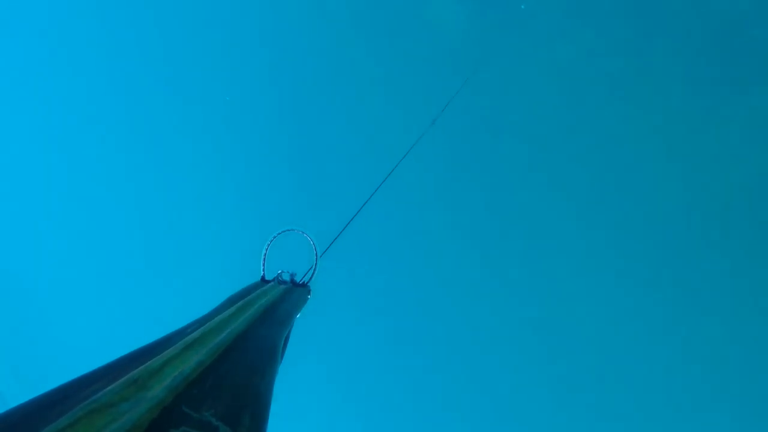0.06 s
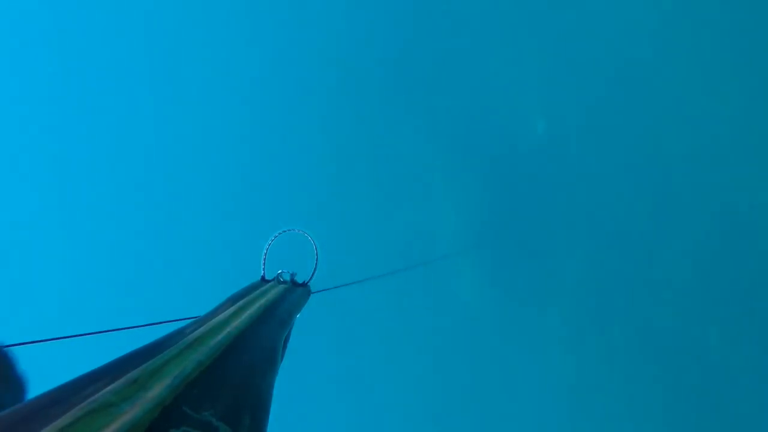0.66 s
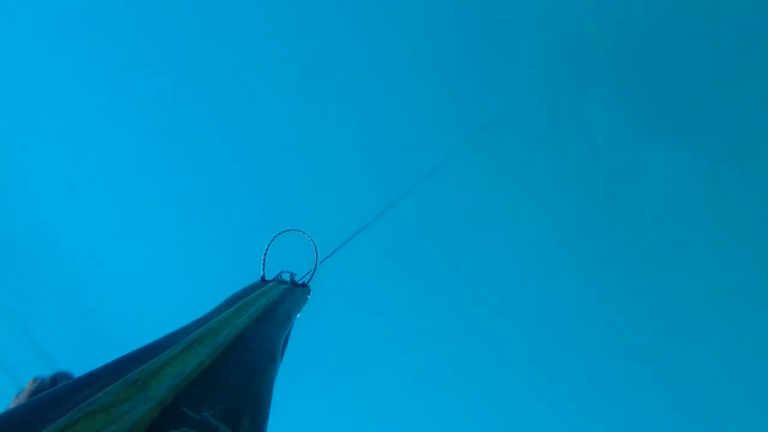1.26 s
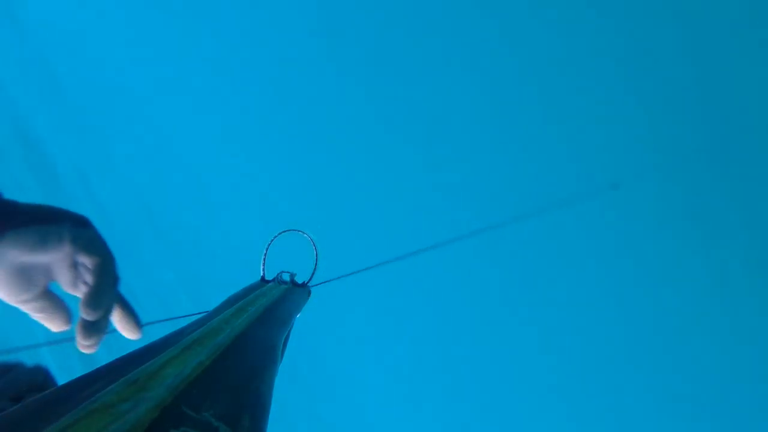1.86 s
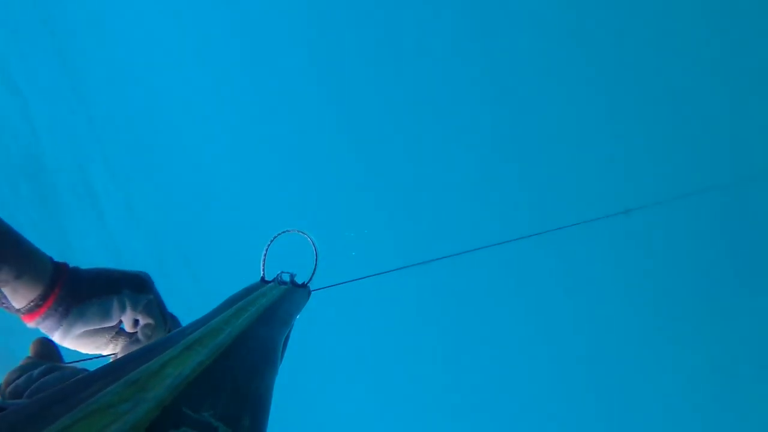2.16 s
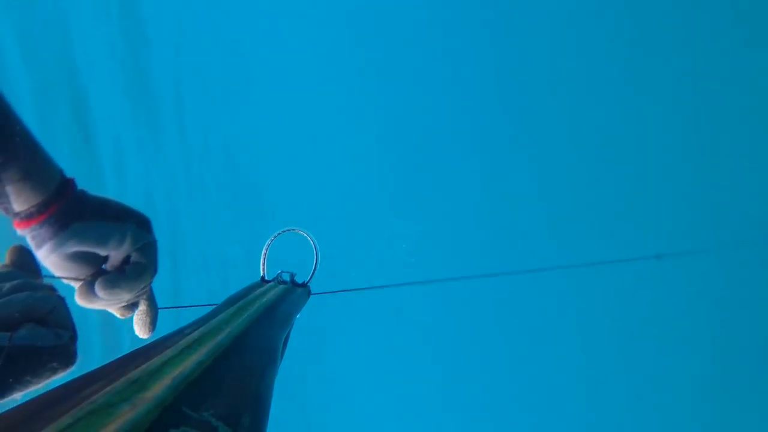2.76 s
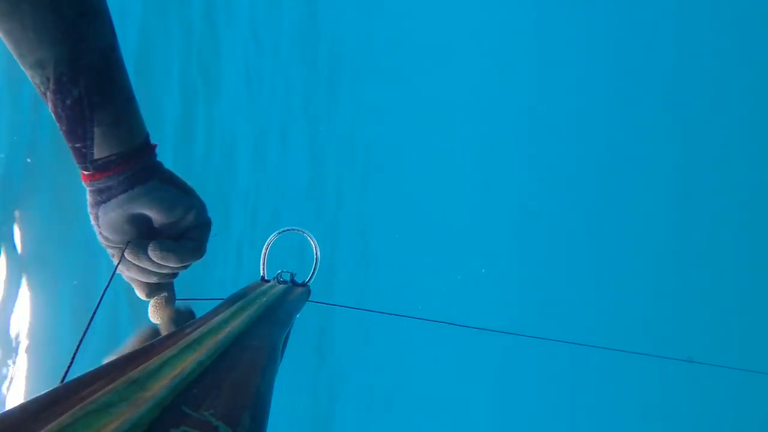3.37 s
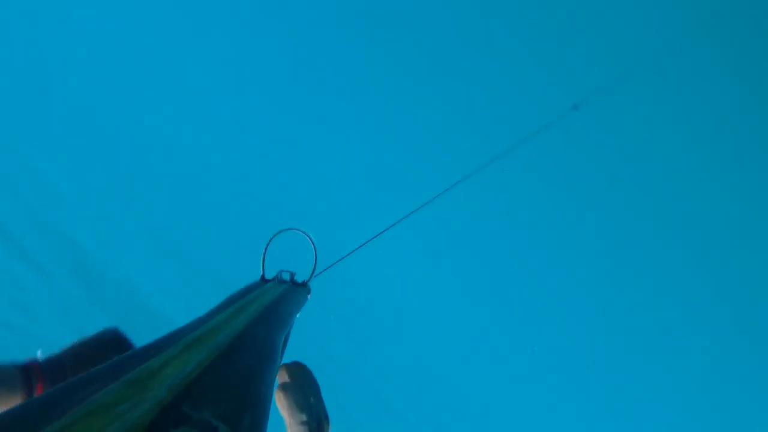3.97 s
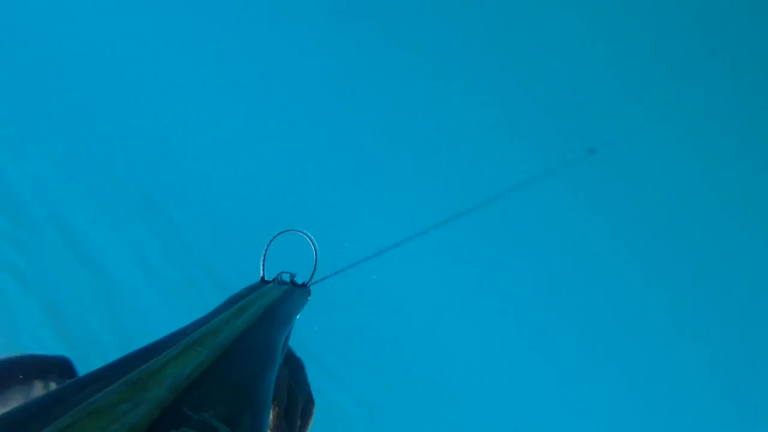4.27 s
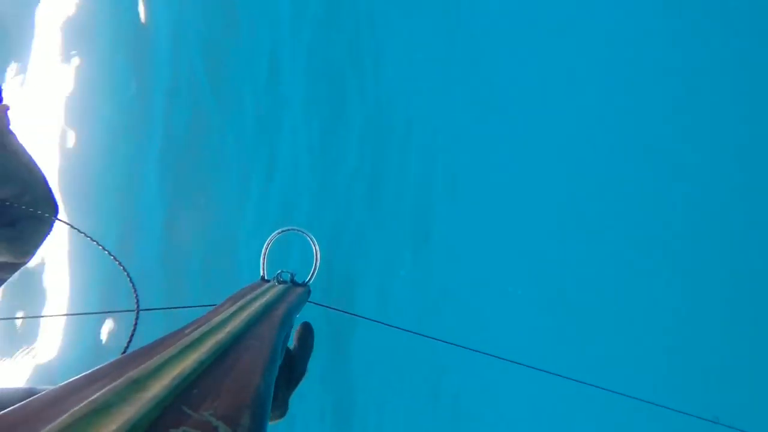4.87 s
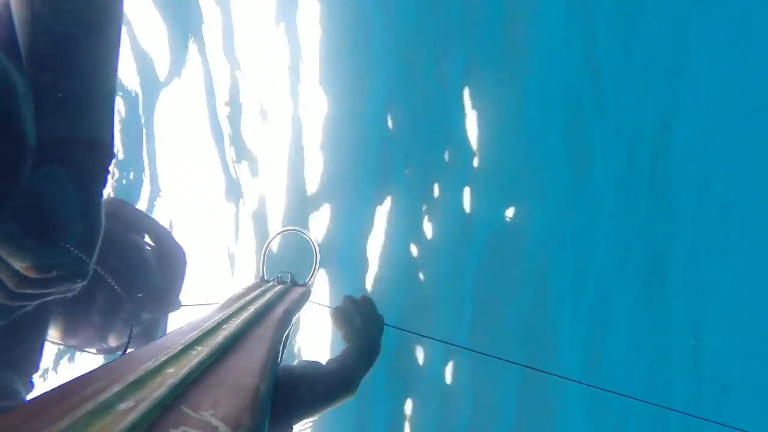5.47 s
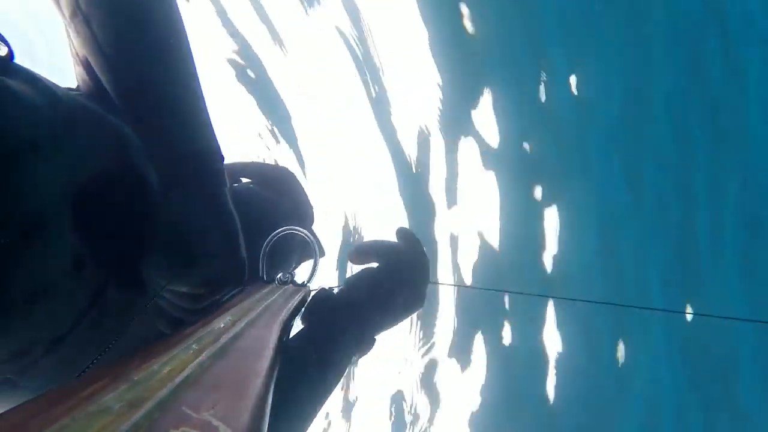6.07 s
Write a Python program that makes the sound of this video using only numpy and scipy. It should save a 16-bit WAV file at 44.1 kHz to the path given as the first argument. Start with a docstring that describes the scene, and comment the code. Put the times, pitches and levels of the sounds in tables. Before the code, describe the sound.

A wooden hull rumbles and knocks, heard underwater, while water gurgles, a hauled line rubs and tiny snaps cut through soft hiss.

```python
"""Under a small wooden boat, heard from inside a waterproof housing; a swimmer hauls a line alongside.
The sea hisses and tiny collapsing bubbles snap. Shoves set the hull rumbling in its low modes.
Water rubs and gurgles along the planks and trapped air gulps. The taut line whistles faintly
and zips over the keel by stick-slip. Knocks ring the hull, singly and in one hard burst."""
import sys
import numpy as np
from scipy import signal
from scipy.fft import rfft, irfft
from scipy.io import wavfile
from scipy.ndimage import uniform_filter1d

SR = 44100
rng = np.random.default_rng(int(sys.argv[2]) if len(sys.argv) > 2 else 0)


def store_wav(level_fs):
    """Save 16-bit WAV to argv[1]."""
    pcm = np.round(np.clip(np.atleast_2d(level_fs), -1, 1) * 32767)
    wavfile.write(sys.argv[1], SR, pcm.T.astype(np.int16))


N = 274724
TIME = np.arange(N) / SR

# spectra: f/Hz, relative density/dB
SEA_SPECTRUM = [(140, 9), (220, 0.5), (820, 4.5), (1000, -5.5), (1750, -4), (2200, -10), (3200, -7),
                (3750, -14), (5050, -12.5), (5350, -17.5), (6100, -14.5), (8200, -22), (9800, -19.5),
                (10120, -14), (10500, -23), (13000, -29)]
SNAP_SPECTRUM = [(800, -19), (3200, 6.5), (4900, -3), (6300, -0.5), (7600, -2.5), (15000, -18)]
WASH_SPECTRUM = [(200, -11), (480, -11), (720, -3.5), (900, -5.5), (1250, 3), (1420, -16.5), (1600, -5),
                 (1780, -11.5), (2000, -13), (2500, -29), (3600, -63.5)]
HOUSING_SPECTRUM = [(1900, -19.5), (2600, -4), (2740, 7), (2890, -9), (3350, -3.5), (3800, -33),
                    (4100, -13), (4500, -23), (4950, -16), (5400, -29), (7200, -24.5), (15000, -54)]
CRACK_SPECTRUM = [(300, -9), (900, 19.5), (2300, 8), (2750, 17), (3400, 5.5), (3900, -3.5), (4900, -3),
                  (15000, -45.5)]  # housing under a blow

# near snaps, likely shrimp: t/s, peak/dB, ring re tick/dB
SNAPS = [(0.2303, -23.5, -11), (0.9678, -30, -18), (1.1768, -19, -21), (1.652, -20, -5), (1.766, -29.5, 1),
         (1.949, -21.5, -17), (1.9726, -17, -12), (2.389, -10.5, -5.5), (2.7967, -33, -15),
         (3.058, -30, -14), (3.1905, -33, -12), (3.2018, -29, 0), (3.9703, -24, -7), (4.083, -21, -22),
         (4.109, -29, -15), (4.3612, -18.5, -21), (4.4374, -15, -22), (4.4985, -12.5, 4),
         (4.724, -28.5, -10), (4.9574, -25.5, -14), (5.295, -32, -6), (5.92, -23.5, -17), (5.981, -27, -3)]
# line whistle envelope: t/s, level/dB
WHISTLE_ENVELOPE = [(2.07, -68), (2.17, -50), (2.34, -76)]
# line whistle partials: f/Hz, gain/dB
WHISTLE_PARTIALS = [(10400, -4), (12540, -16), (14620, -16)]

# swimmer's shoves on the hull: start/s, end/s, level/dB
SHOVES = [(0.097, 0.268, -20), (0.287, 0.386, -11), (0.504, 0.71, -14), (0.961, 1.133, -17.5),
          (1.689, 1.82, -18), (1.82, 1.906, -12.5), (1.967, 2.12, -16.5), (3.901, 4.105, -11),
          (5.318, 5.4, -29), (6.158, 6.238, -22.5)]
# hull lurches: t/s, f/Hz, level/dB
LURCHES = [(-.04, 29.21, -13.5), (3.937, 23.92, -6.5)]
HEAVE_HZ, BEND_HZ = (24, 29), (59, 87)
SHOVE_ATTACK_S, BEND_FALL_DB_PER_S, HEAVE_FALL_DB_PER_S = 0.054, 81, 20

# air pockets under the hull: centre/s, f/Hz, level/dB, length/s
GULPS = [(0.21, 800, -35.5, 0.05), (0.259, 680, -31.5, 0.067), (0.48, 390, -21.5, 0.057),
         (0.857, 780, -36, 0.038), (1.603, 780, -31.5, 0.027), (2.035, 358.3, -21, 0.086),
         (3.635, 163, -23.5, 0.17), (3.745, 136.5, -22.5, 0.3), (4.179, 790, -28.5, 0.03),
         (4.266, 373, -23, 0.1), (4.436, 720, -31.5, 0.15), (4.804, 152, -31, 0.14),
         (5.545, 146, -29.5, 0.19), (5.662, 160, -33, 0.18), (5.798, 364, -25, 0.19),
         (5.911, 356.5, -22.5, 0.16), (6.06, 158.5, -31.5, 0.19)]
# flow-driven hull resonances: f/Hz, width/Hz, relative level/dB
SLOSH_MODES = [(137, 6.4, 2.5), (163, 5.6, -1.5)]
PLANK_MODES = [(302, 83, -3), (362.5, 24, 8), (418.4, 6.8, 4)]
# water surges: crest/s, rise/s, fall/s, wash/dB, gurgle/dB, planks/dB, housing/dB
SURGES = [(.2, 0.33, 0.28, -39, -38, -35, -46), (1.85, 0.91, 0.64, -41.5, -47.5, -40, -57),
          (4.31, 0.21, 0.27, -35, -33.5, -31.5, -38), (5.87, 0.32, 0.29, -34, -46, -40, -46.5)]
# line rubs on the hull: start/s, end/s, wash/dB, housing/dB
RUBS = [(0.407, 0.542, -31.5, -33), (0.546, 0.686, -36, -36.5), (0.727, 0.78, -37.5, -45),
        (0.896, 0.964, -37, -48.5), (1.014, 1.28, -35, -44.5), (1.195, 1.24, -28.5, -47),
        (1.485, 1.58, -42.5, -44.5), (2.008, 2.088, -29.5, -37.5), (2.097, 2.355, -43, -45),
        (2.475, 2.582, -50, -47.5), (2.637, 2.696, -43.5, -44), (2.901, 3.018, -42, -50),
        (3.044, 3.138, -40, -52), (3.193, 3.258, -40.5, -55), (3.588, 3.66, -33.5, -42),
        (3.695, 3.765, -30.5, -43), (4.606, 4.865, -39.5, -53)]

# line over the keel, one curve per pull: t/s, f/Hz, level/dB
PULLS = [
    [(.313, 2907, -13.5), (.327, 3533, -13), (.335, 3055, -14), (.344, 1800, -20), (.351, 665, -22.5),
     (.362, 328, -23), (.385, 330, -37)],
    [(.535, 1500, -29), (.552, 1485, -23), (.6, 1497, -34.5), (.655, 1350, -21), (.715, 1035, -35.5)],
    [(1.025, 1666, -34), (1.075, 2440, -41.5)],
    [(1.199, 749, -28), (1.215, 702, -17.5), (1.245, 696, -33)],
]
# noise share of the squeak's fundamental, per pull: power fraction/1
PULL_CHURN = [0.44, 0.83, 0.92, 0.076]
# blows on the hull: t/s, level/dB, low-pass corner/Hz, crack/dB, clunk/dB
KNOCKS = [(0.319, -3.5, 302, -44, -21), (1.365, -16.5, 1500, -22.5, -35), (1.853, -15, 1200, -26.5, -30),
          (2.036, -10, 1190, -19, -33), (3.324, -28, 1500, -30.5, -28.5), (3.793, -13.5, 600, -54, -24.5),
          (3.864, -13, 895, -25.5, -34), (3.886, -0.5, 1000, -25, -32), (3.909, 1.5, 1200, -16.5, -3.5),
          (3.946, -0.5, 1200, -16.5, -3), (3.981, 3.5, 650, -16, -12.5)]
# struck hull modes: f/Hz, gain/dB, t60/s
HULL_MODES = [(86, -10.5, 0.19), (125, -16.5, 0.17), (153.87, -21, 1), (232, -13.5, 0.09),
              (267.7, -17.5, 0.18), (366, -11, 0.11), (417.5, -16, 0.16), (491, -11.5, 0.048),
              (839, -18, 0.12), (1045, -12, 0.033)]


def from_db(db):
    return np.exp(np.log(10) / 20 * np.asarray(db))


def unit_rms(x):
    return x / np.sqrt(np.mean(x ** 2) + 1e-20)


def level_out(x, span_s):
    """Running rms held at 1."""
    power = uniform_filter1d(x * x, max(int(span_s * SR), 2))
    return x / np.sqrt(np.abs(power) + 1e-12)


def curves(rows):
    """Breakpoint columns interpolated per sample."""
    times_s, *columns = np.transpose(rows)
    return [np.interp(TIME, times_s, column) for column in columns]


def gate(rows):
    """1 between the first and last breakpoint."""
    return 1.0 * ((TIME > rows[0][0]) & (TIME < rows[-1][0]))


def drift(rate_hz):
    """Low-passed noise, rms 1."""
    hop = 40
    pole = np.exp(-2 * np.pi * rate_hz * hop / SR)
    slow = signal.lfilter([1], [1, -2 * pole, pole * pole], rng.standard_normal(N // hop + 2002))[2000:]
    return np.interp(np.arange(N) / hop, np.arange(len(slow)), unit_rms(slow))


def colour(x, spectrum, size=2048):
    """Minimum-phase filter of unit energy."""
    hz, db = np.transpose(spectrum)
    grid_hz = np.maximum(np.fft.rfftfreq(size, 1 / SR), 1)
    gain = from_db(np.interp(np.log(grid_hz), np.log(hz), db))
    cepstrum = irfft(np.log(gain))
    cepstrum[size // 2:] = 0
    response = irfft(np.exp(rfft(2 * cepstrum)))
    return signal.fftconvolve(x, response / np.linalg.norm(response))[:len(x)]


def noise_band(hz, width_hz):
    """White noise through two equal resonators."""
    b, a = signal.iirpeak(hz, hz / (1.5 * width_hz), fs=SR)
    return signal.lfilter(b, a, signal.lfilter(b, a, rng.standard_normal(N)))


def ring(force, hz, t60_s):
    """Damped mode; a unit impulse starts a unit sine."""
    r, w = from_db(-60 / (t60_s * SR)), 2 * np.pi * hz / SR
    return signal.lfilter([0, np.sin(w)], [1, -2 * r * np.cos(w), r * r], force + 1e-18)


def wavering(hz, wander_hz, rate_hz, flicker_db):
    """Tone of rms about 1; pitch and level wander."""
    phase = 2 * np.pi * (np.cumsum(hz + wander_hz * drift(rate_hz)) / SR + rng.random())
    return np.sqrt(2) * np.sin(phase) * from_db(flicker_db * drift(rate_hz))


def sea(hiss_db=-43, snaps_per_s=60, snap_db=-43, ring_db=-15, t60_cycles=20):
    """Steady hiss with far snaps, mostly faint, at random pitches."""
    nearness_db = np.minimum(6 * rng.exponential(1, N), 18)
    clicks = (rng.random(N) < snaps_per_s / SR) * from_db(snap_db + nearness_db)
    pitches_hz = np.geomspace(4000, 13000, 12)
    choice = rng.integers(0, len(pitches_hz), N)
    rings = sum(ring(clicks * (choice == k), hz, t60_cycles / hz) for k, hz in enumerate(pitches_hz))
    hiss = from_db(hiss_db) * colour(rng.standard_normal(N), SEA_SPECTRUM)
    return hiss + colour(clicks + from_db(ring_db) * rings, SNAP_SPECTRUM)


def snaps(collapse_s=0.0007, echo_s=0.019, echo_db=-26, ring_rise_s=0.00035, ring_hz=6200):
    """Bubble collapse: hard tick, brief housing ring, faint scatter from hull and surface."""
    out, t = np.zeros(N), TIME[:SR // 25]
    envelope = np.exp(-t / collapse_s) + from_db(echo_db) * np.exp(-t / echo_s)
    housing = t / ring_rise_s * np.exp(1 - t / ring_rise_s) * np.sin(2 * np.pi * ring_hz * t)
    for start_s, peak_db, ring_db in SNAPS:
        at = int(start_s * SR)
        tick = colour(rng.standard_normal(len(t)) * envelope, SNAP_SPECTRUM)
        snap = tick / np.abs(tick).max() + from_db(ring_db) * housing
        out[at:at + len(t)] += from_db(peak_db) * snap / np.abs(snap).max()
    return out


def line_whistle():
    """Thin high whistle of the taut line running through the hand."""
    partials = sum(from_db(db) * wavering(hz, wander_hz=50, rate_hz=110, flicker_db=6.5)
                   for hz, db in WHISTLE_PARTIALS)
    return from_db(curves(WHISTLE_ENVELOPE)[0]) * partials * gate(WHISTLE_ENVELOPE)


def push(start_s, end_s, fall_db_per_s):
    """Envelope of one push: ramp, hold, decay."""
    attack = np.clip((TIME - start_s) / SHOVE_ATTACK_S, 0, 1)
    return attack * from_db(-fall_db_per_s * np.maximum(TIME - end_s, 0))


def shove_envelope(fall_db_per_s):
    """Swing of a hull mode; the strongest shove rules."""
    pushes = [from_db(db) * push(start_s, end_s, fall_db_per_s) for start_s, end_s, db in SHOVES]
    return np.max(pushes, axis=0)


def hull_rumble(bend, heave_rest_db=-29.5, heave_share_db=-11.5, bend_rest_db=-36, upper_db=-8):
    """The hull heaves in two beating modes, swings on after a lurch and booms in two bending modes."""
    shoved = from_db(heave_share_db) * shove_envelope(HEAVE_FALL_DB_PER_S)
    beating = sum(wavering(hz, wander_hz=0.73, rate_hz=6.1, flicker_db=-1.0) for hz in HEAVE_HZ)
    heave = np.hypot(from_db(heave_rest_db), shoved) * beating
    for start_s, hz, db in LURCHES:
        swing = from_db(db) * push(start_s, start_s + SHOVE_ATTACK_S, HEAVE_FALL_DB_PER_S)
        heave += swing * wavering(hz, wander_hz=0.46, rate_hz=4.8, flicker_db=-0.2)
    lower = wavering(BEND_HZ[0], wander_hz=2.43, rate_hz=7.8, flicker_db=3.5)
    upper = wavering(BEND_HZ[1], wander_hz=2.035, rate_hz=8.13, flicker_db=4.0)
    return heave + np.hypot(from_db(bend_rest_db), bend) * (lower + from_db(upper_db) * upper)


def gulps():
    """Each trapped air pocket swells and fades at its own unsteady pitch."""
    out = np.zeros(N)
    for centre_s, hz, db, length_s in GULPS:
        swell = np.cos(np.pi * np.clip((TIME - centre_s) / length_s, -.5, .5)) ** 2
        out += from_db(db) * swell * wavering(hz, wander_hz=0.02805 * hz, rate_hz=hz / 10, flicker_db=2.5)
    return out


def gurgle(bubbles_per_s=170, t60_cycles=46, centre_hz=730, spread_octaves=0.24):
    """Small bubbles shaken loose at random, each ringing at its own pitch."""
    pitches_hz = np.geomspace(450, 1350, 20)
    odds = np.exp(-.5 * (np.log2(pitches_hz / centre_hz) / spread_octaves) ** 2)
    births = rng.standard_normal(N) * (rng.random(N) < bubbles_per_s / SR)
    choice = rng.choice(len(pitches_hz), N, p=odds / odds.sum())
    bubbles = sum(ring(births * (choice == k), hz, t60_cycles / hz) for k, hz in enumerate(pitches_hz))
    return level_out(bubbles, span_s=0.1)


def hull_drone(modes, span_s):
    """Turbulence drives a group of hull resonances."""
    return level_out(sum(from_db(db) * noise_band(hz, width_hz) for hz, width_hz, db in modes), span_s)


def friction(slips_per_s=1500, grain_db=1.5, hiss_gain=0.56, flutter_db=2.0):
    """Small uneven slips over a smooth hiss, rms 1."""
    sizes = from_db(grain_db * np.minimum(rng.exponential(1, N), 4)) * rng.choice([-1, 1], N)
    slips = unit_rms(sizes * (rng.random(N) < slips_per_s / SR))
    hiss = hiss_gain * rng.standard_normal(N)
    return unit_rms((slips + hiss) * from_db(flutter_db * drift(rate_hz=34.6)))


def rubbing(bend, slips, roundness=1.19, eddy_db=1.36, edge_share=0.29,
            rub_gurgle_db=-12.5, rub_planks_db=-3.5, bend_planks_db=-24.5, ring_db=-7):
    """Water and line graze the hull: wash hisses, bubbles gurgle, planks drone, the housing rings."""
    power = np.zeros((4, N))
    for crest_s, rise_s, fall_s, *levels_db in SURGES:
        swell = np.exp(-np.maximum((crest_s - TIME) / rise_s, (TIME - crest_s) / fall_s) ** roundness)
        power += (from_db(levels_db)[:, None] * swell) ** 2
    power *= from_db(eddy_db * drift(rate_hz=16)) ** 2
    housing_flow = np.sqrt(power[-1])
    for start_s, end_s, wash_db, housing_db in RUBS:
        inside = np.minimum(TIME - start_s, end_s - TIME) / (edge_share * (end_s - start_s))
        levels_db = [wash_db, wash_db + rub_gurgle_db, wash_db + rub_planks_db, housing_db]
        power += (from_db(levels_db)[:, None] * np.clip(.5 + inside, 0, 1)) ** 2
    wash, bubbles, planks, housing = np.sqrt(power)
    planks = np.hypot(planks, from_db(bend_planks_db) * bend)
    drone = hull_drone(PLANK_MODES, span_s=0.14) + hull_drone(SLOSH_MODES, span_s=0.098)
    # main housing mode, strongest under smooth flow
    ring_gain = np.hypot(from_db(ring_db) * housing, housing_flow)
    housing_ring = level_out(noise_band(hz=2726, width_hz=59), span_s=0.067)
    return (wash * colour(slips, WASH_SPECTRUM) + bubbles * gurgle() + planks * drone
            + housing * colour(slips, HOUSING_SPECTRUM) + ring_gain * housing_ring)


def churning(hz, rate_hz=260):
    """Noise band around a moving centre, rms 1."""
    phase = 2 * np.pi * np.cumsum(hz) / SR
    return drift(rate_hz) * np.cos(phase) + drift(rate_hz) * np.sin(phase)


def line_zips(roughness=0.0713, overtone_db=-13, rasp_db=-6, sizzle_db=-14, fast_hz=3200, wall_hz=3600):
    """Stick-slip on the keel: a squeak breaks into churning; pitch and rasp brightness follow speed."""
    squeaks, hiss = np.zeros(N), np.zeros(N)
    rasp = from_db(rasp_db) * colour(rng.standard_normal(N), CRACK_SPECTRUM)
    sizzle = from_db(sizzle_db) * unit_rms(noise_band(hz=4330, width_hz=1460))
    for pull, churn in zip(PULLS, PULL_CHURN):
        hz, db = curves(pull)
        speed = hz / fast_hz
        level = from_db(db) * uniform_filter1d(gate(pull), size=128)
        tone = wavering(hz, wander_hz=roughness * hz, rate_hz=325, flicker_db=3)
        overtone = wavering(2 * hz, wander_hz=4 * roughness * hz, rate_hz=325, flicker_db=3)
        fundamental = np.sqrt(1 - churn) * tone + np.sqrt(churn) * churning(hz)
        squeaks += level * (fundamental + from_db(overtone_db) * overtone)
        hiss += level * speed * (rasp + speed * sizzle)
    housing_wall = signal.butter(12, wall_hz, fs=SR, output="sos")
    return signal.sosfilt(housing_wall, squeaks + 1e-18) + hiss


def knocks(slips, contact_s=0.00303, crack_s=0.0057, rebound_s=0.00724, rebound_db=-1, clatter_s=0.01,
           clatter_db=-20.5, housing_db=-9, clunk_hz=762, clunk_rise_s=0.006, clunk_spread=0.023):
    """Blow and rebound ring the hull; trapped air clunks, loose gear clatters, the housing cracks."""
    mode_hz, mode_db, t60_s = np.transpose(HULL_MODES)
    count = len(HULL_MODES)
    forces = np.zeros((count, N))
    cracks, clatter, clunks = np.zeros((3, N))
    t = TIME[:SR // 10]
    crunch = level_out(slips, crack_s)
    crack_swell, clunk_swell = ((t / rise_s * np.exp(1 - t / rise_s)) ** 2
                                for rise_s in (crack_s / 2, clunk_rise_s))
    for start_s, db, corner_hz, crack_db, clunk_db in KNOCKS:
        at = int(start_s * SR)
        span = slice(at, at + len(t))
        # soft blows spare the high modes
        strength = from_db(db + mode_db) / np.hypot(1, (mode_hz / corner_hz) ** 2)
        for delay_s, gain in ((0, 1), (rebound_s, from_db(rebound_db))):
            arrivals = at + ((delay_s + contact_s * rng.random(count)) * SR).astype(int)
            forces[np.arange(count), arrivals] += gain * strength * rng.choice([-1, 1], count)
        cracks[span] += from_db(crack_db) * crack_swell * crunch[span]
        clatter[span] += from_db(db + clatter_db) * np.exp(-t / clatter_s) * rng.standard_normal(len(t))
        air_hz = clunk_hz * (1 + clunk_spread * rng.standard_normal())
        clunks[span] += from_db(clunk_db) * clunk_swell * np.sin(2 * np.pi * air_hz * t)
    hull = sum(map(ring, forces, mode_hz, t60_s))
    gear = colour(clatter, WASH_SPECTRUM) + from_db(housing_db) * colour(clatter, HOUSING_SPECTRUM)
    return hull + clunks + colour(cracks, CRACK_SPECTRUM) + gear


def scene():
    """Mono sum inside the housing."""
    bend = shove_envelope(BEND_FALL_DB_PER_S)
    slips = friction()
    boat = hull_rumble(bend) + rubbing(bend, slips) + gulps() + line_zips() + knocks(slips)
    return (boat + snaps() + sea() + line_whistle())[None]


def record(dry):
    """The loudest blows clip; a steep low-pass cuts the top."""
    cutoff_hz = 15300
    lowpass = signal.ellip(8, .05, 60, cutoff_hz, fs=SR, output="sos")
    return signal.sosfiltfilt(lowpass, np.clip(dry, -1, 1))


dry = scene()
out = record(dry)
store_wav(out)
```